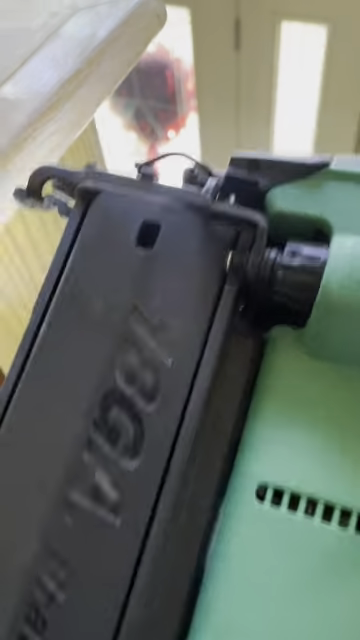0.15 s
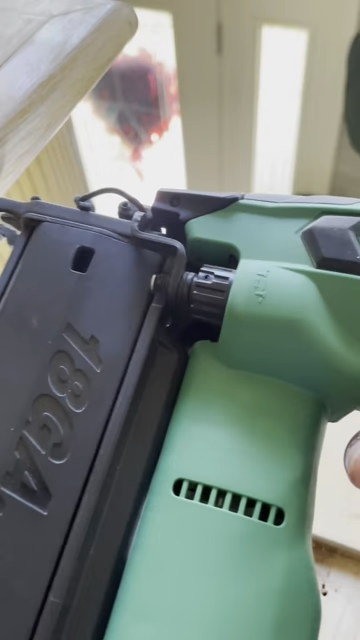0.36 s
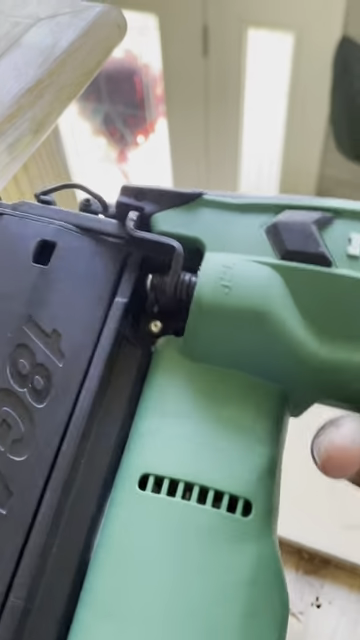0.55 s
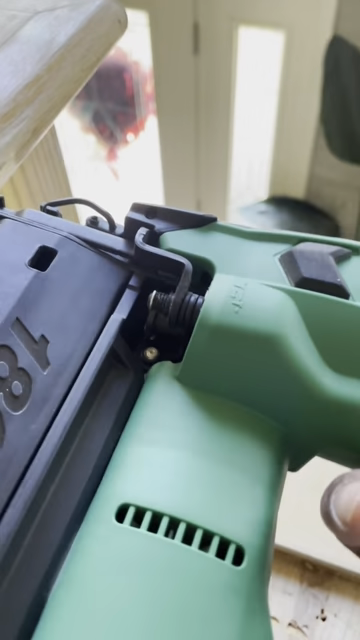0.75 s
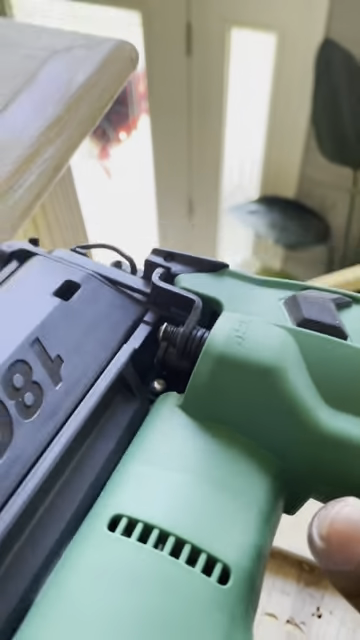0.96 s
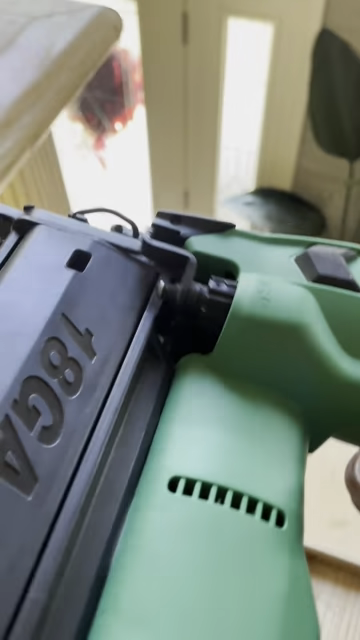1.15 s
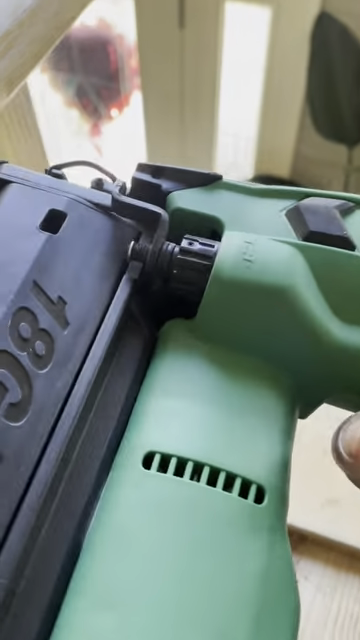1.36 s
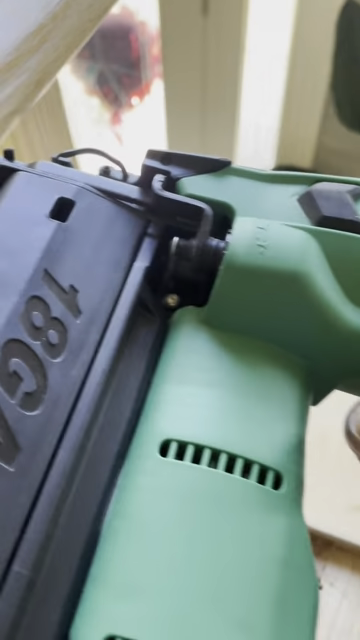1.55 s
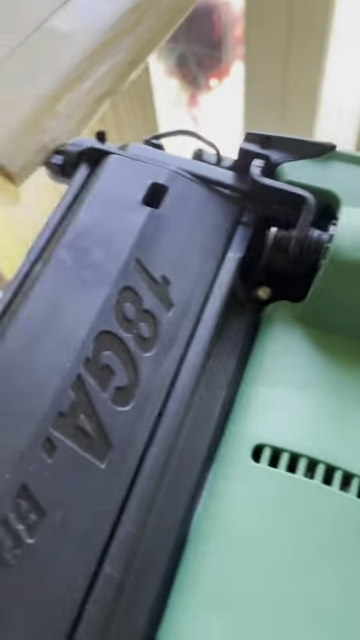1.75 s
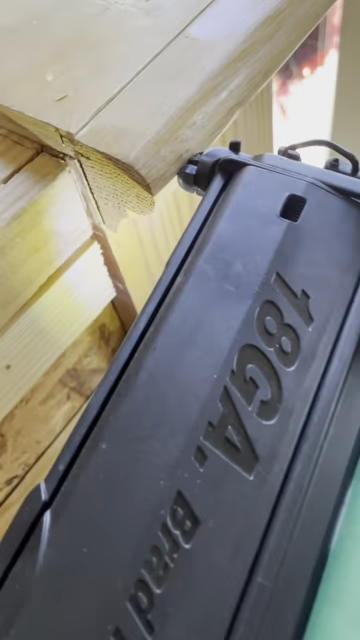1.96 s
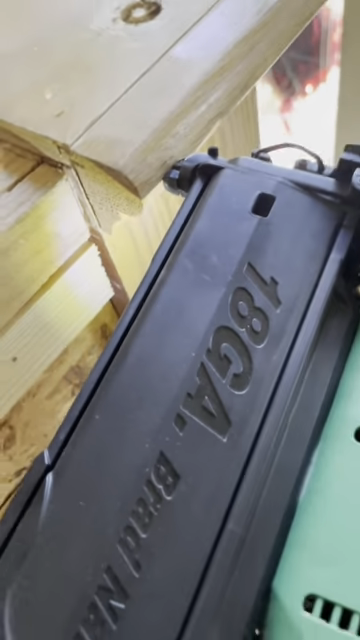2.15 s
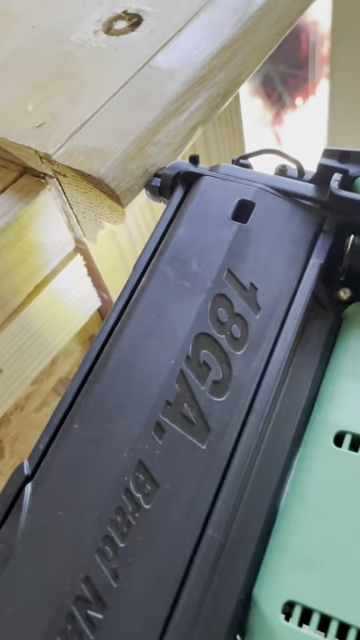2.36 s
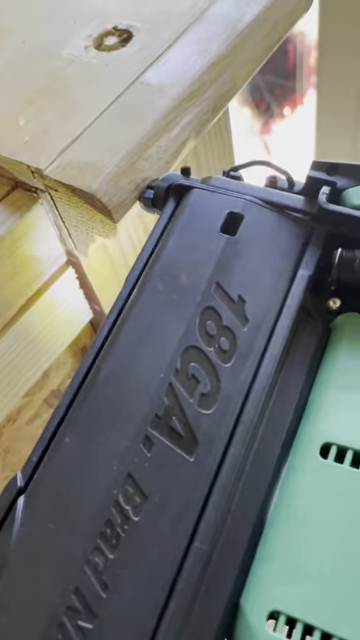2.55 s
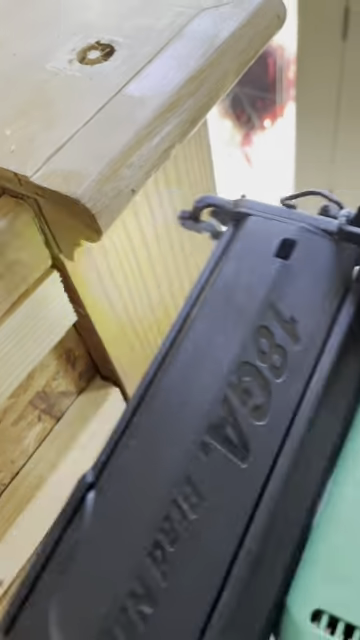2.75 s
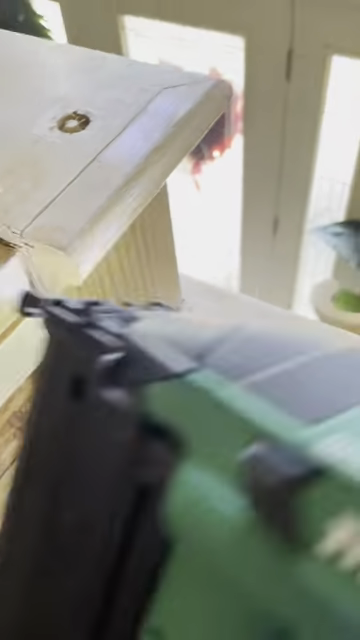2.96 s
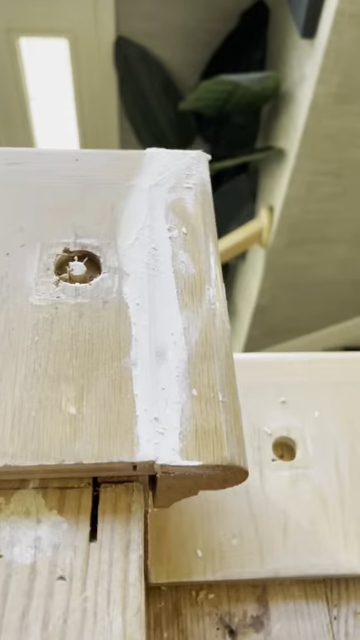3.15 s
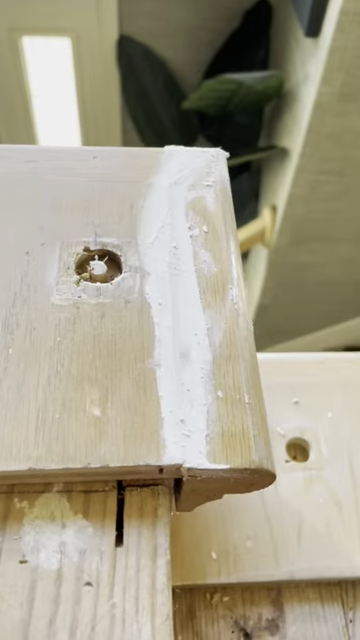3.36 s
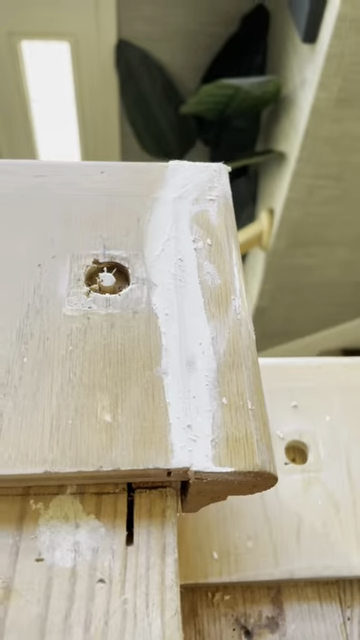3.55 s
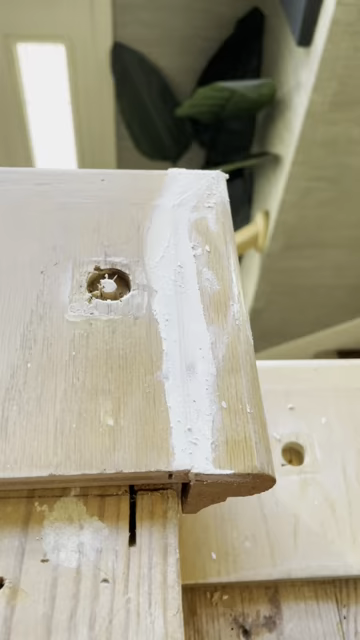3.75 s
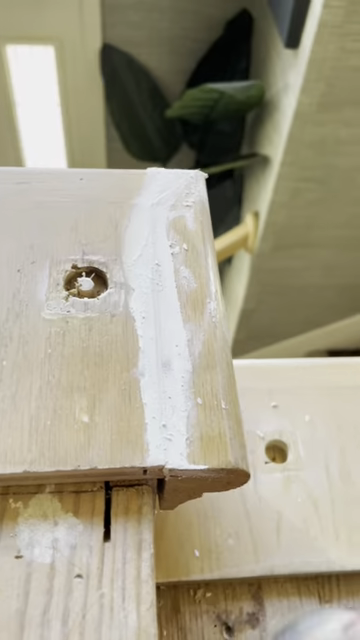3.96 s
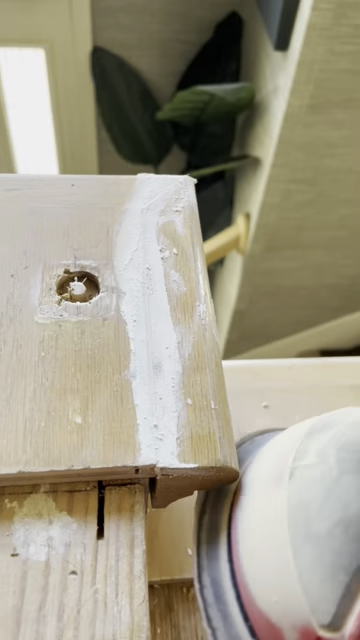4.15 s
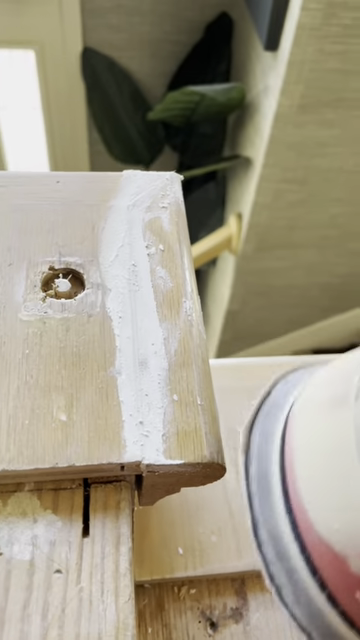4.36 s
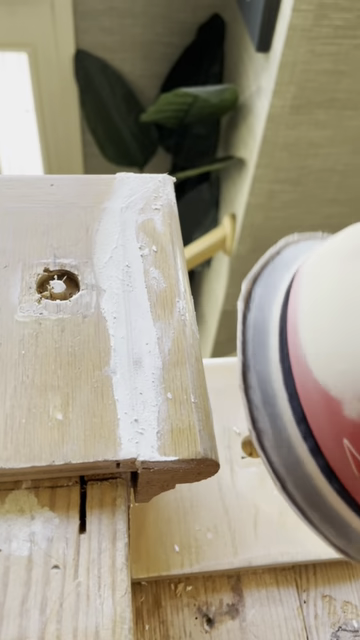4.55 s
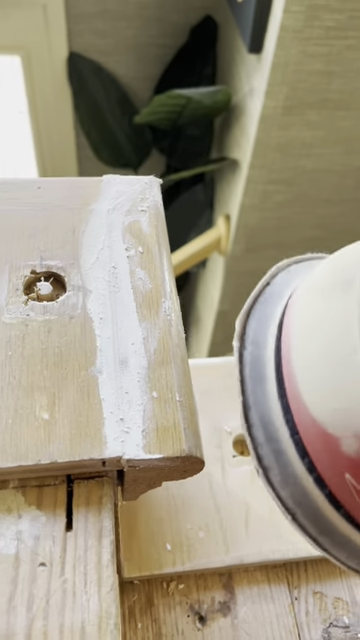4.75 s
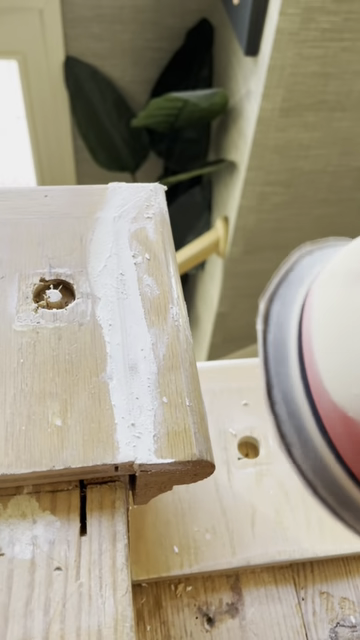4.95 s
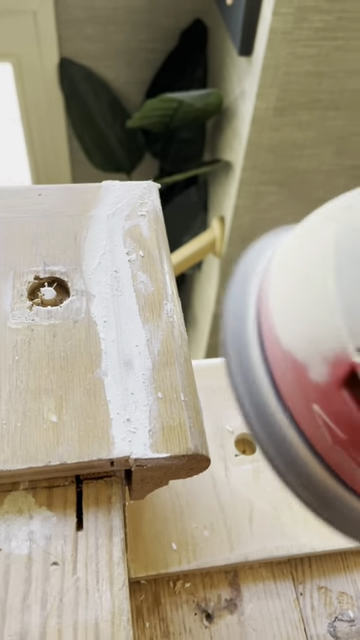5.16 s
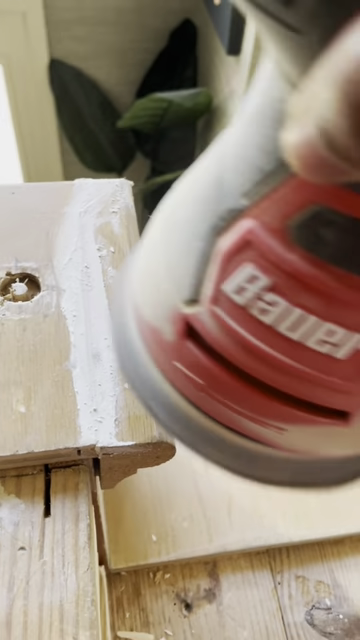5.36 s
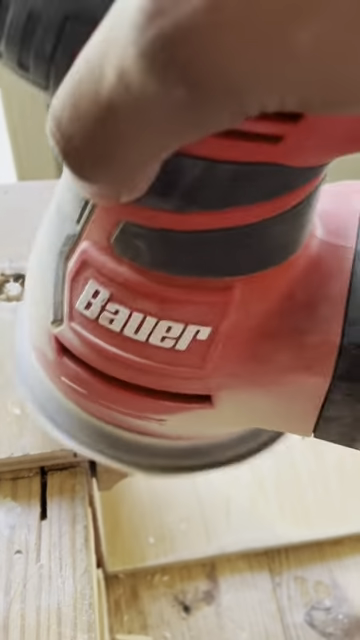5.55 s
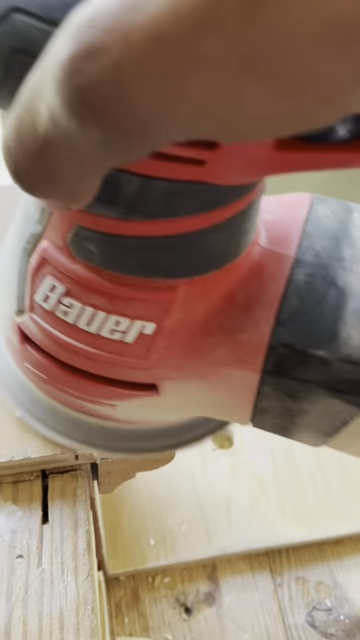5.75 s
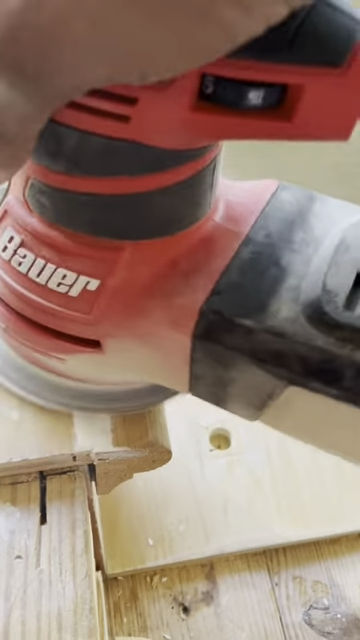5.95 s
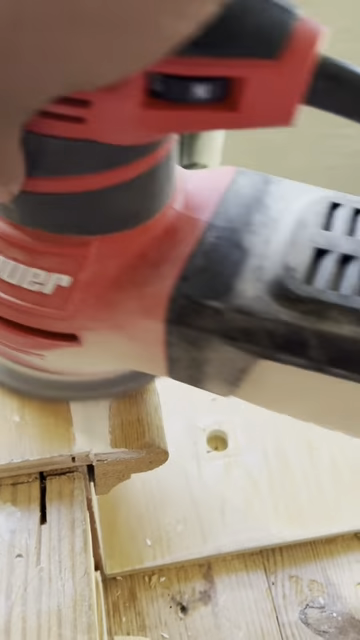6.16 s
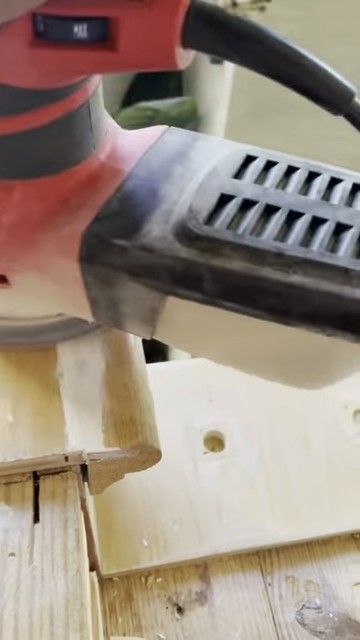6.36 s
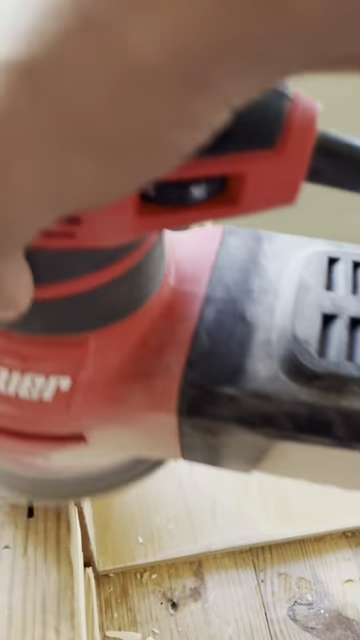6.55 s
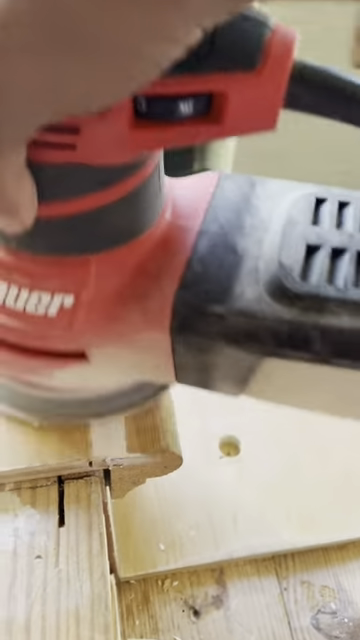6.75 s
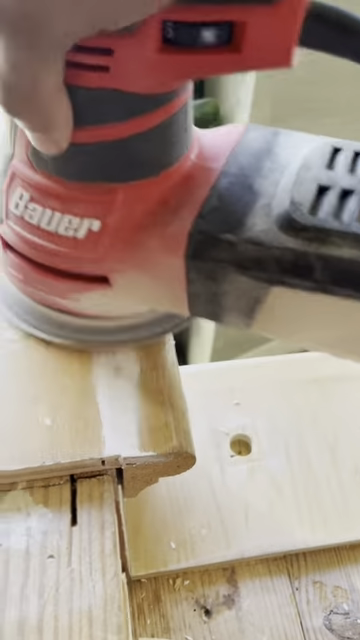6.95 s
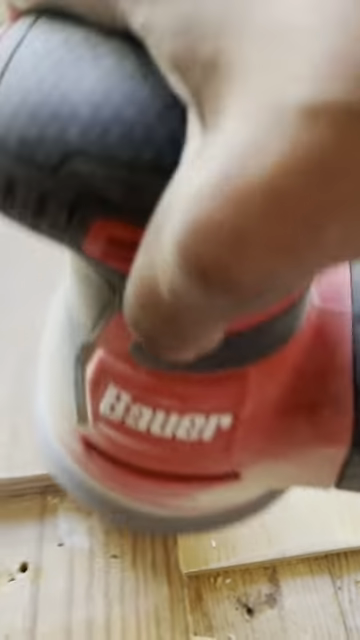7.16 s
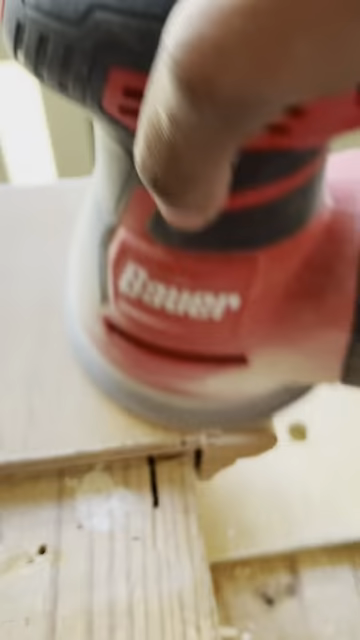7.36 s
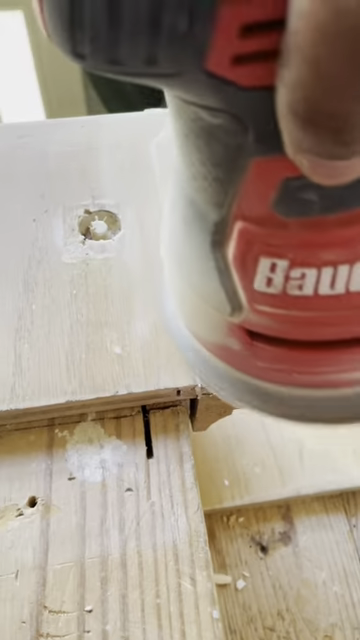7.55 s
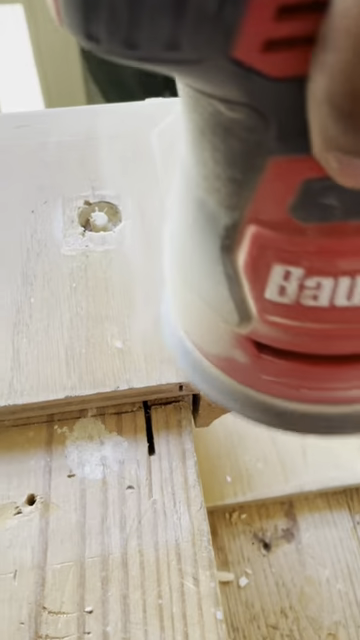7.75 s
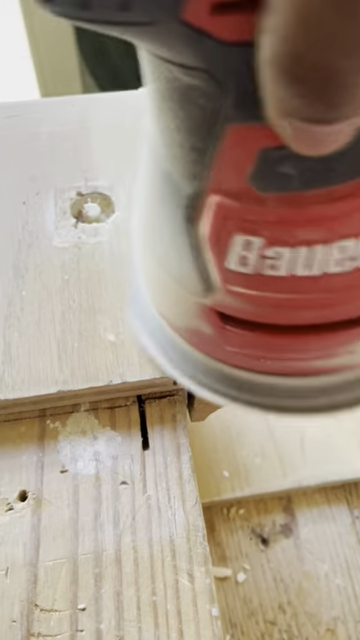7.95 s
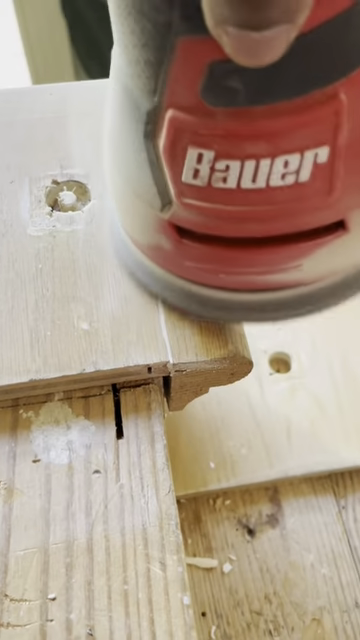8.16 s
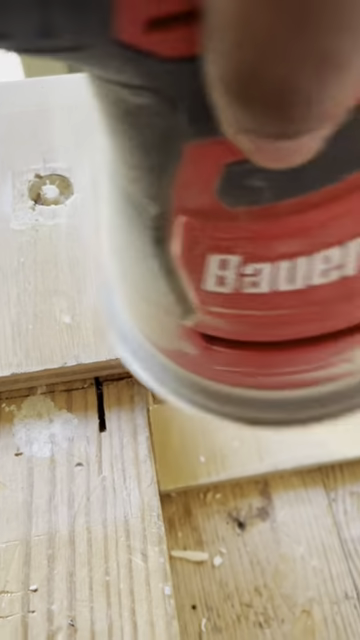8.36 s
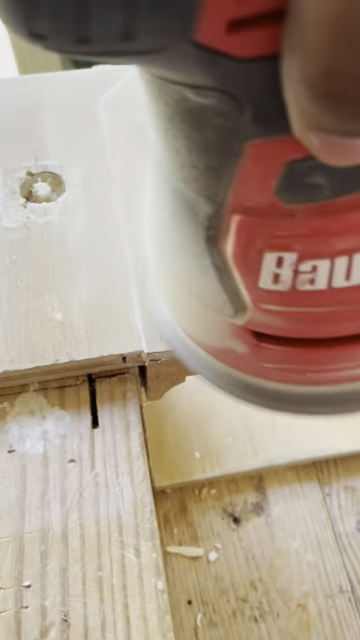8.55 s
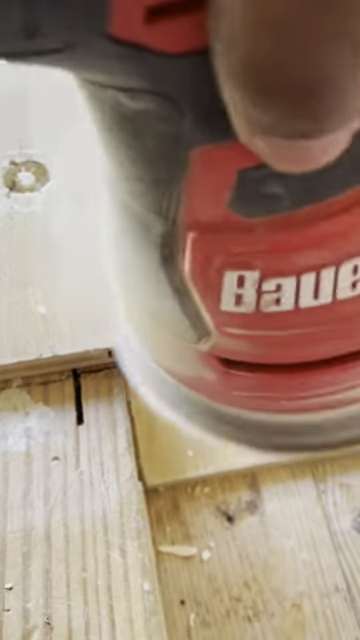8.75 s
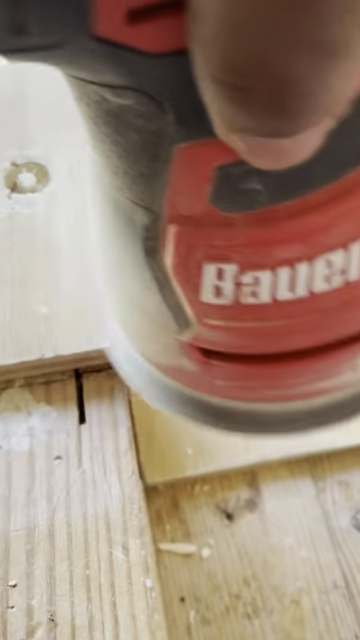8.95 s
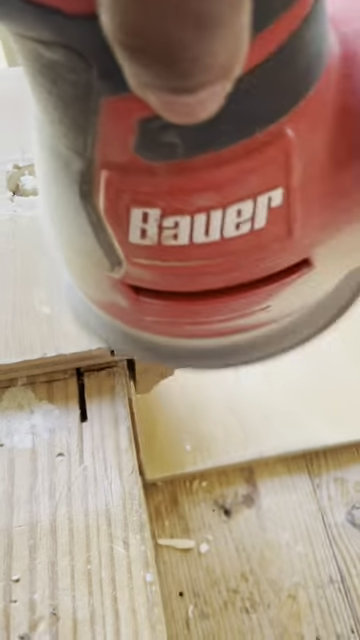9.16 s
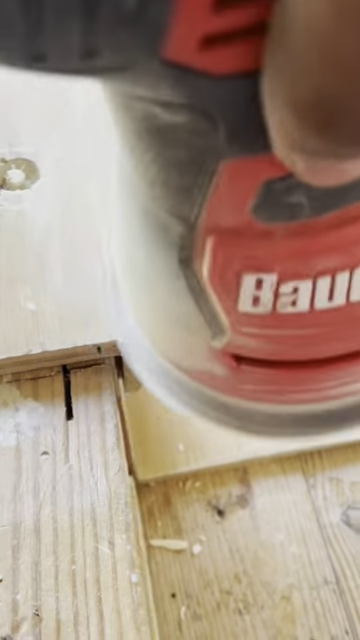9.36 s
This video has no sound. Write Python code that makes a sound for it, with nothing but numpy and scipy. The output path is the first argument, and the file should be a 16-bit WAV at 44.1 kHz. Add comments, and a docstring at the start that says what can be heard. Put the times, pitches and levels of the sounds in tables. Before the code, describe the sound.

Sparse handling noises first: small clicks, scuffs and dull wooden taps over a faint low rumble, broken by one loud thump with a rattly plastic clack. After a quiet gap, a click and an orbital sander revs up within half a second, surges, then settles to a constant drone. Its buzz throbs several times a second over rushing air and grinding grit; it cuts out for an instant, then continues. Close microphone, indoors.

```python
"""A quiet hall with a wooden stair: a tool is shifted about and set down, then an orbital sander starts.
Handling is swells of gritty noise, and knocks ring the wood's modes over a low rumble and rustle.
The off-centre weight hums once a turn, the freely turning pad makes the overtones throb, the rotor
whines, and fan air and grit hiss. Left and right differ in phase in the treble."""
import sys
import numpy as np
from scipy import signal
from scipy.fft import rfft, irfft, next_fast_len
from scipy.io import wavfile
from scipy.ndimage import uniform_filter1d

SR = 44100
rng = np.random.default_rng(int(sys.argv[2]) if len(sys.argv) > 2 else 0)


def unload_audio(sound):
    """Save the sound as a 16-bit wav file, at the path given as the first command line argument."""
    columns = np.transpose(np.atleast_2d(sound))
    # keep every value between -1 and 1, then stretch to whole-number steps
    steps = np.round(np.clip(columns, -1, 1) * 32767)
    wavfile.write(sys.argv[1], SR, steps.astype(np.int16))


N = 414540
HZ = np.fft.rfftfreq(N, 1 / SR)
TIME = np.arange(N) / SR
START_S = 4.942  # the motor starts


def amp(db):
    """Decibels to gain."""
    return 10 ** (np.asarray(db) / 20)


def unit(x):
    """Scales to rms 1."""
    return x / np.sqrt(np.mean(x ** 2) + 1e-20)


def track(points):
    """Follows a table of (time [s], value) in straight lines."""
    return np.interp(TIME, *np.transpose(points))


def read(points, hz):
    """Reads a spectrum on a log-frequency axis."""
    f, value = np.transpose(points)
    return np.interp(np.log(hz + 1), np.log(f + 1), value)


def noise(gain):
    """Two unrelated noises of one colour: the direct sound and what the walls scatter."""
    white = rng.standard_normal((2, N))
    return unit(irfft(rfft(white) * gain, N))


def peak(hz, width):
    """A resonance curve; width [Hz] is between its half-amplitude points."""
    return 1 / (1 + (2 * (HZ - hz) / width) ** 2)


def peaks(table):
    """Sums resonances from (frequency [Hz], width [Hz], level [dB])."""
    return sum(amp(db) * peak(f, width) for f, width, db in table)


def drift(hz):
    """Slow chance of rms about 1, up to hz changes a second."""
    steps = uniform_filter1d(rng.standard_normal(int(N / SR * hz * 4) + 9), size=4)
    return np.interp(TIME * hz * 4, np.arange(len(steps)), 2 * steps)


def settle(start_db, peak_s, peak_db, steady_db, settle_s, bend):
    """Level in dB that climbs from the motor start to a peak and then settles; bend shapes the climb."""
    t = TIME[::64]
    climb = np.clip((t - START_S) / (peak_s - START_S), 0, 1) ** bend
    settled = 1 - np.exp(-(np.maximum(t - peak_s, 0) / settle_s) ** 1.5)
    level = start_db + (peak_db - start_db) * climb + (steady_db - peak_db) * settled
    return np.interp(TIME, t, level)


def stirred(events, quiet_db, full_db, share, lead_db, fade_db):
    """Gain that swells toward each event and fades after it, with slopes in dB/s.

    full_db belongs to an event at 0 dB; share is how far the gain follows the event's level."""
    t = TIME[::256, None]
    s, db = np.transpose(events)[:2]
    slope = np.where(t < s, lead_db, fade_db)
    near = amp(full_db + share * db - slope * abs(t - s))
    return np.interp(TIME, t[:, 0], np.hypot(amp(quiet_db), near.max(1)))


# Colour of the faint rustle in the hall: (frequency [Hz], relative level [dB])
RUSTLE_COLOUR = [(150, -9), (300, 5), (1000, -1), (2000, -11), (4000, -11), (8000, -23), (16000, -28.5)]


def hall():
    """Lumpy low rumble stirred by the knocks and a faint rustle stirred by the scuffs."""
    rumble_gain = stirred(KNOCKS, quiet_db=-77, full_db=-56, share=.3, lead_db=150, fade_db=45)
    rustle_gain = stirred(SCUFFS, quiet_db=-86, full_db=-52, share=.3, lead_db=170, fade_db=60)
    rumble = noise(peak(64, 50)) * rumble_gain * amp(2.5 * drift(8.7))
    rustle = noise(amp(read(RUSTLE_COLOUR, HZ))) * rustle_gain * amp(2.5 * drift(31))
    return rumble + rustle


# Resonances of the tool's casing as it is handled: (frequency [Hz], width [Hz], relative level [dB])
CASING_MODES = [(751, 340, 3), (1080, 250, 1), (1735, 690, -1), (2420, 350, -3.5), (3100, 670, -4),
                (4200, 1200, -5)]
# Scuffs and ticks of handling on the stair: (time [s], swell level [dB], rise time [ms], fall time [ms],
# low part re swell [dB], treble part re swell [dB], ring frequency [Hz]); either time spans about 9 dB
SCUFFS = [(0.088, -30, 13.4, 12, -17.5, -4.5, 4340), (0.191, -59.5, 88, 17, -14, -2, 2410),
          (0.28, -52, 6, 25, -6, -6, 4130), (0.301, -45, 17, 10, -13, -4, 4130),
          (0.395, -41, 8.9, 10, -3.5, -3, 2580), (0.48, -47, 29, 55, 9, -15, 1030),
          (0.525, -35, 16, 13.5, 4, -20, 1540), (0.6, -53, 69, 20, 0.5, -16, 690),
          (0.89, -51.5, 6.8, 13.5, 2.5, 4.5, 690), (0.98, -48.5, 4.8, 19, -5, -4.5, 687),
          (1.159, -45, 16.6, 37, -3.5, -18, 1040), (1.214, -39.5, 12.6, 21, -13.5, 4, 1010),
          (1.24, -50.5, 37, 13, 3, -1, 3100), (1.282, -50, 33, 12, 7, -6, 2410),
          (1.327, -41, 7.6, 7, -1.5, -4, 1720), (1.374, -39, 9.2, 3, -19, -16, 1020),
          (1.425, -39, 6, 12.5, -21, 6, 4400), (1.47, -50, 51, 37, -0.5, -24, 860),
          (1.504, -49.5, 25, 13, 1, -3, 1720), (1.543, -42, 15, 20.5, 4, -15, 850),
          (1.88, -56.5, 15, 16, -9, 15, 870), (2.412, -53.5, 5.6, 5, -14.5, -31, 1040),
          (2.479, -13.5, 11, 19.5, -22.5, -7.5, 3160), (2.501, -22, 12.3, 7.5, -2, -3.5, 3400),
          (2.56, -41.5, 37, 32, -9.5, -4, 1890), (2.585, -32.5, 15, 20, -12, -5, 1940),
          (2.64, -49.5, 42, 37, -9, -18, 860), (2.726, -48, 26, 14.5, -7.5, -1.5, 1023),
          (3.108, -50, 7, 14, 0, -9, 852), (3.126, -37, 7, 2, 0, -6.5, 1040),
          (3.41, -66.5, 49, 34, -6, 6.5, 4480), (3.491, -60, 31, 11.5, -8, -22, 1030),
          (3.63, -70, 40, 30, -8, 4, 4400), (3.764, -62, 21, 15, 8, -15, 2070),
          (3.81, -66, 37, 29, 5.5, -9, 1540), (3.876, -67, 17, 35, -5.5, 0, 1024),
          (3.983, -64, 34, 38, -5, -8, 1215), (4.099, -42.5, 14.5, 6.5, -1, -6.5, 690),
          (4.134, -53.5, 21, 15, 3, -12, 690), (4.201, -58, 13, 11, -6, -1, 4310),
          (4.31, -50, 25, 14, -6.5, -17, 1390), (4.634, -63, 14.6, 13.5, -11, -26, 690),
          (4.753, -57, 8.8, 15, -4, -22, 1220), (4.936, -33, 9.7, 37, -15, -14, 740)]


def scuffs():
    """Swells of gritty noise: a hollow low part, the casing with one ring of its own, and a treble part."""
    low = noise(peak(260, 110) + .3 * peak(450, 250))
    casing = noise(peaks(CASING_MODES))
    treble_peaks = peak(5900, 500) + .6 * peak(7000, 500) + .5 * peak(12000, 600) + peak(16000, 900)
    treble = noise((HZ > 4500) * (.35 + treble_peaks))
    grit = 1 + 0.28 * drift(300)
    out = np.zeros((2, N))
    for s, db, rise_ms, fall_ms, low_db, treble_db, ring_hz in SCUFFS:
        part = slice(max(round((s - .15) * SR), 0), round((s + 0.17) * SR))
        ms = 1000 * (TIME[part] - s)
        span = np.where(ms < 0, rise_ms, fall_ms)
        swell = amp(db - 12.4 * (np.sqrt((ms / span) ** 2 + 0.14) - 0.3725))  # a rounded top
        resonator = signal.iirpeak(ring_hz, 8, SR)
        ring = unit(signal.lfilter(*resonator, treble[:, part] + casing[:, part]))
        hollow_db = -.3 * min(treble_db + 5, 3)  # dull scuffs sound hollower: more ring, less casing
        mix = amp(-3.5 - hollow_db) * casing[:, part] + amp(-8.5 + hollow_db) * ring
        mix += amp(low_db) * low[:, part] + amp(treble_db) * treble[:, part]
        out[:, part] += swell * grit[part] * mix
    return out


# Modes of the wooden stair: (frequency [Hz], relative level [dB], t60 before the knock's factor [s])
WOOD_MODES = [(48, -4, 0.27), (71, -0.5, 0.18), (103, -0.5, 0.1), (151, 0.5, 0.21), (201, -1, .15),
              (245, -5, .14), (335, -4, 0.11), (530, -4, .12), (780, -12, .08)]
# Knocks on the wood: (time [s], peak level [dB], centre of the blow [Hz], factor on the ring time [1])
KNOCKS = [(.275, -39.5, 300, 0.58), (.455, -39, 200, 1.2), (0.516, -30, 216, .9), (0.521, -31, 98.5, 1.6),
          (.862, -43, 190, 0.38), (.909, -42.5, 170, 0.28), (1.54, -35.5, 400, .4), (1.543, -37, 76, 1.34),
          (2.497, -14.5, 397, 0.34), (2.503, -3.5, 109, 0.21), (2.555, -39, 52, 1.3), (2.61, -41, 65, 1.1),
          (3.118, -30.5, 199, 0.27), (3.47, -48, 100, 1.31), (3.733, -37, 335, 0.77), (3.745, -42, 78, 1.3),
          (4.085, -40, 300, 0.45), (4.095, -40, 80, 1), (4.135, -43, 150, 0.71), (4.145, -48, 70.5, 1.6)]


def knocks():
    """Each blow rings the modes of the wood near its centre; a mode takes about a cycle to build up."""
    t = np.arange(SR // 2) / SR
    out = np.zeros(N)
    f, mode_db, t60 = (column[:, None] for column in np.transpose(WOOD_MODES))
    for s, db, hz, factor in KNOCKS:
        near_db = -25 * np.log2(f / hz) ** 2
        decay = amp(mode_db + near_db - 60 * t / (t60 * factor))
        build_up = 1 - np.exp(-1.5 * f * t)
        ring = (decay * build_up * np.sin(2 * np.pi * f * t)).sum(0)
        part = out[round(s * SR):][:len(t)]
        part += amp(db) * ring / abs(ring).max()
    return out


# Speed the shaft closes in on after the start: (time [s], speed [turns/s])
RUNNING_SPEED = [(5.7, 220.2), (6.0, 218.3), (6.8, 218.8), (7.3, 217.4), (7.5, 220), (8.0, 220.4),
                 (9.4, 219.1)]


def shaft_angle():
    """Shaft angle [rad]: the speed nears its running value exponentially, with slight chance wander."""
    run_up_s = .137  # time constant
    speed = track(RUNNING_SPEED) * (1 - np.exp(-np.maximum(TIME - START_S, 0) / run_up_s))
    return 2 * np.pi * np.cumsum(speed * (1 + 0.00212 * drift(25))) / SR


# The pad creeps round on its bearing: (time [s], angle [turns])
PAD_TURNS = [(5.4, 0.03), (5.65, 1.73), (5.9, 4.05), (6.15, 6.85), (6.4, 9.21), (6.65, 12.18), (6.9, 13.72),
             (7.15, 15.67), (7.4, 18.37), (7.8, 21.75), (8.15, 24.4), (8.4, 26.45), (9.1, 31.37),
             (9.39, 33.59)]


def pad_angle():
    """Pad angle [rad] on its free bearing."""
    return 2 * np.pi * track(PAD_TURNS)


# How evenly the pad rocks on the wood:
# (time [s], factor on throb of low overtones [1], factor on throb of high overtones [1])
ROCKING = [(5.4, 0.68, 0.36), (6.2, 0.7, .3), (7.3, 0.61, 0.39), (7.5, 1.02, .7), (8.25, 1, 0.86),
           (8.4, 0.55, 1.01), (9.4, 0.55, 1.03)]


def pad_rocking():
    """Strength of the pad's rocking for the low and for the high overtones."""
    s, low, high = np.transpose(ROCKING)
    return np.interp(TIME, s, low), np.interp(TIME, s, high)


# Hum of the weight, sagging where the pad is eased or tilted: (time [s], level [dB])
HUM_LEVEL = [(4.949, -46), (4.975, -40.5), (5.0, -22), (5.049, -14), (5.15, -15), (5.31, -10), (5.4, -12.5),
             (5.82, -13.5), (6.45, -14.5), (6.62, -20.5), (6.8, -16.5), (7.18, -16), (7.23, -21),
             (7.29, -24), (7.34, -16), (8.1, -15), (9.4, -14.5)]


def weight_hum(shaft):
    """The off-centre weight shakes the tool once a turn."""
    return amp(track(HUM_LEVEL) + .4 * drift(30)) * np.cos(shaft)


def rotor_whine(shaft):
    """Rotor slots (12 a turn) and commutator bars (24 a turn) whine, swinging with every turn."""
    slot_db = settle(-58, peak_s=5.09, peak_db=-28, steady_db=-46.5, settle_s=.42, bend=1.)
    bar_db = settle(-52, peak_s=5.015, peak_db=-31.5, steady_db=-37, settle_s=.04, bend=1.1)
    whine = 0
    for order, db in ((12, slot_db), (24, bar_db)):
        swing = 1 + .7 * np.cos(shaft) + 0.8 * (drift(120) + 1j * drift(120))
        whine += amp(db) * (swing * np.exp(1j * order * shaft)).real
    return whine


def motor_buzz(shaft):
    """The straining motor buzzes on multiples 3 to 30 of the shaft speed while it gains speed."""
    buzz_db = settle(-52, peak_s=5.28, peak_db=-30, steady_db=-60, settle_s=.25, bend=.35)
    run_up = (TIME > START_S) & (TIME < 6)
    buzz = np.zeros(N)
    for order in range(3, 31):
        flutter = amp(-.4 * order + 2.5 * drift(20)[run_up])
        buzz[run_up] += flutter * np.cos(order * shaft[run_up] + rng.uniform(0, 2 * np.pi))
    return amp(buzz_db) * buzz


# What the shell passes of whine and buzz: (frequency [Hz], gain [dB])
SHELL_GAIN = [(300, -14), (1500, -8), (1850, 1), (2050, 2.5), (2300, -3.5), (2600, -3.5), (3350, -1),
              (3800, -16), (6000, -10)]
# Resonances of housing and board: (frequency [Hz], width [Hz], relative level [dB])
HOUSING_MODES = [(784, 170, 1), (976, 250, -1)]


def through_shell(whine, buzz):
    """The shell colours whine and buzz; the housing also carries the buzz."""
    shell = amp(read(SHELL_GAIN, HZ))
    return irfft(rfft(whine) * shell + rfft(buzz) * (shell + .45 * peaks(HOUSING_MODES)), N)


def roar(pad):
    """Housing roar that swells once a pad turn, a start squeal, and a board rumble that grows in time."""
    roar_db = settle(-44.5, peak_s=5.05, peak_db=-27.5, steady_db=-34.3, settle_s=.5, bend=.5)
    squeal_db = settle(-39, peak_s=4.99, peak_db=-27.5, steady_db=-48, settle_s=.04, bend=.7)
    rumble_db = -62 + 3.5 * (TIME - 7)  # grows 3.5 dB/s
    swell = 1 + 0.11 * np.cos(pad + 1.8)
    out = noise(peaks(HOUSING_MODES)) * amp(roar_db + 2.7 * drift(12)) * swell
    out += amp(squeal_db) * noise(peak(2060, 120))
    return out + amp(rumble_db) * noise(peak(70, 80))


# Colour of the hiss of fan air and grit: (frequency [Hz], relative level [dB])
HISS_COLOUR = [(40, -92), (120, -71), (300, -62.5), (560, -68), (900, -57.5), (1650, -66.5), (2200, -63.5),
               (3000, -67.5), (4700, -70.5), (5500, -68.5), (8000, -70), (11500, -74.5), (14200, -74),
               (15700, -80.5)]


def air_hiss(shaft, pad):
    """Fan air and grit hiss, pulsing once a shaft turn and twice a pad turn."""
    hiss_db = settle(-34.5, peak_s=5.31, peak_db=-20.5, steady_db=-26.2, settle_s=.25, bend=.45)
    pulse = 1 + 0.061 * np.cos(shaft + 1) + 0.048 * np.cos(2 * pad - 2.4) + .08 * drift(20)
    return amp(hiss_db) * noise(amp(read(HISS_COLOUR, HZ))) * pulse


# Overtones of the hum: (multiple of the shaft speed [1], relative level [dB], throbs per pad turn [1],
# throb depth before rocking [1], pad angle of the throb [rad])
OVERTONES = [(2, -2.5, 1, 0.75, 0.36), (3, 1.5, 1, 0.2, -.7), (4, -5, 1, 0.6, 3.5), (5, -3.5, 1, 0.45, 1.2),
             (6, -8, 1, .4, 1.8), (7, -14.5, 1, 0.9, 1), (8, -14.5, 2, .4, -2.5), (9, -10.5, 1, 0.7, 0),
             (10, -11, 2, 0.72, -1.5), (11, -9, 2, 0.44, -2), (12, -16, 2, .5, -2), (13, -16.5, 2, 0.5, -2),
             (14, -17, 2, 0.58, -2.5), (15, -21, 2, 0.5, -3.5), (16, -20.5, 2, 0.88, -4.5),
             (17, -21.5, 2, .9, -1.5), (18, -17.5, 2, 0.83, -3.5), (19, -17.5, 2, 0.66, -1),
             (20, -16, 2, .9, -3), (21, -26.5, 2, 0.98, -7.5), (36, -21, 1, .3, 0.5), (42, -31, 1, .3, -1),
             (47, -21, 1, .3, -.7), (48, -11, 1, .3, 1), (54, -19.5, 1, .3, 0), (63, -22, 1, .3, -1.5),
             (65, -24.5, 1, .3, -3), (66, -22, 1, .3, -2.5)]


def throbbing_overtones(shaft, pad, over_db, low_rock, high_rock):
    """Multiples of the shaft speed throb as the pad creeps round: by beating, or by its edge biting."""
    on = TIME > START_S
    total = 0
    for order, db, throbs, depth, angle in OVERTONES:
        turn = throbs * pad[on] + angle
        lag = 0
        if throbs == 1:  # a tone just below beats against the overtone
            throb = 1 + depth * np.exp(-1j * turn)
        else:  # the pad edge bites in a burst twice a turn
            rock = (low_rock if order < 15 else high_rock)[on]
            throb = amp(1.2) * rock ** .6 * np.exp(1.3 * depth * rock * np.cos(turn))
            lag = np.round(.27 * order)  # cycles by which the tone falls behind in each pad turn
        waver = .1 * order ** .5 * (drift(16) + 1j * drift(16))[on]
        phase = order * shaft[on] - lag * pad[on] + rng.uniform(0, 2 * np.pi)
        total += amp(db) * (throb * (1 + waver) * np.exp(1j * phase)).real
    out = np.zeros(N)
    out[on] = amp(over_db[on]) * total
    return out


def biting_grit(pad, over_db, low_rock, high_rock):
    """Grit bites harder each time the pad rocks over, twice a pad turn."""
    out = np.zeros((2, N))
    for f, width, db, rock in ((2210, 380, -15, low_rock), (4200, 920, -18, high_rock)):
        bite = rock * np.exp(1.06 * rock * np.cos(2 * pad - 2.4))
        out += amp(over_db + db) * bite * noise(peak(f, width))
    return out


def sander():
    """Tones and noises of the running sander, sharing one shaft angle and one pad angle."""
    shaft, pad = shaft_angle(), pad_angle()
    low_rock, high_rock = pad_rocking()
    over_db = settle(-56, peak_s=5.75, peak_db=-30, steady_db=-32, settle_s=.6, bend=.4)
    tones = weight_hum(shaft) + through_shell(rotor_whine(shaft), motor_buzz(shaft))
    tones += throbbing_overtones(shaft, pad, over_db, low_rock, high_rock)
    air = roar(pad) + air_hiss(shaft, pad) + biting_grit(pad, over_db, low_rock, high_rock)
    fade_in = np.clip((TIME - START_S) / .02, 0, 1)
    dip = np.clip(abs(TIME - 7.43) / .032, .04, 1)  # the level dips briefly at 7.43 s
    gate = fade_in * dip
    return np.sqrt(2) * tones * gate, air * gate  # the root makes tone levels rms


# Likeness of left and right noise by frequency: (frequency [Hz], likeness [1])
LEFT_RIGHT_LIKENESS = [(250, 1), (450, .85), (700, .72), (1250, .75), (1600, 1), (2050, 1), (2750, .6),
                       (4300, .65), (4800, .4), (5400, .9), (8500, .88), (9250, 1), (10900, 1),
                       (11500, .85), (13600, .85), (14600, 1)]
# The sander on the left over the right: (frequency [Hz], level difference [dB])
LEFT_OVER_RIGHT = [(100, 0), (220, 2), (440, 4), (560, 0), (660, -7), (900, -1), (1200, 1), (1600, 0),
                   (4300, -1), (6000, 0)]


def scene():
    """Noises reach the right partly as scattered sound; steady tones and knocks arrive alike."""
    alike = np.interp(HZ, *np.transpose(LEFT_RIGHT_LIKENESS))

    def to_stereo(direct, scattered):
        """Left hears the direct sound, right a blend of direct and scattered."""
        return np.array([direct, alike * direct + np.sqrt(1 - alike ** 2) * scattered])

    handling = irfft(to_stereo(*rfft(hall() + scuffs())), N) + knocks()
    tones, air = sander()
    side = amp(read(LEFT_OVER_RIGHT, HZ) / 2)  # half the difference up on the left, half down on the right
    machine = (rfft(tones) + to_stereo(*rfft(air))) * [side, 1 / side]
    return handling + irfft(machine, N) * (TIME > START_S)


# Phase between left and right: bends upward, opposed at 9.3-10.8 kHz:
# (frequency [Hz], lead of the left [rad])
LEFT_LEAD = [(0, 0), (1700, 0), (4300, 1.2), (4800, 3.2), (5340, 6.3), (8950, 9.2), (9300, np.pi * 3),
             (10800, np.pi * 3), (11050, 9.6), (14600, np.pi * 4), (16000, np.pi * 4)]


def record(dry):
    """Left and right differ in phase and lose the deepest bass; then the treble is band-limited."""
    bass_hz, edge_hz = 22., 15720
    size = next_fast_len(N + 4096)
    lead = np.interp(np.fft.rfftfreq(size, 1 / SR), *np.transpose(LEFT_LEAD))
    half = np.exp(.5j * lead)
    stereo = irfft(rfft(dry, size) * [half, 1 / half], size)[:, :N]
    stereo = signal.lfilter(*signal.butter(2, bass_hz, "high", fs=SR), stereo)
    band_limit = signal.firwin(1201, edge_hz, window=("kaiser", 11), fs=SR)
    return signal.oaconvolve(stereo, band_limit[None], "same")


dry = scene()
out = record(dry)
unload_audio(out)
```